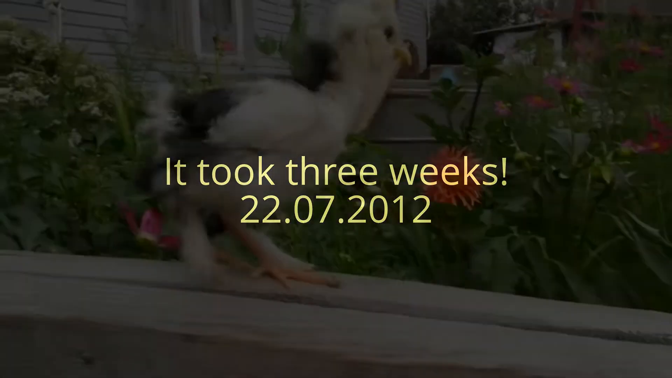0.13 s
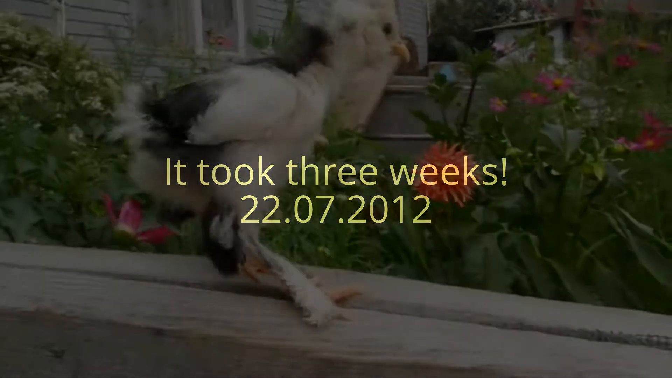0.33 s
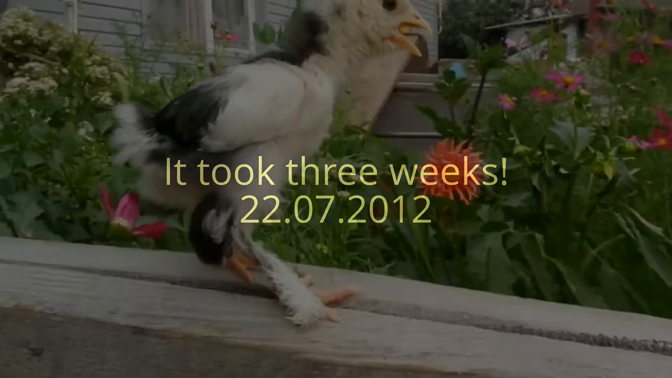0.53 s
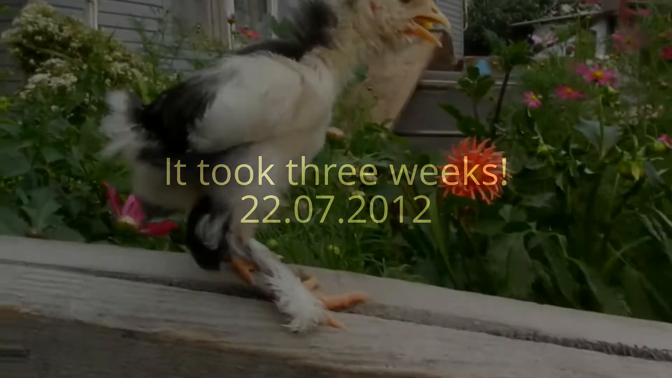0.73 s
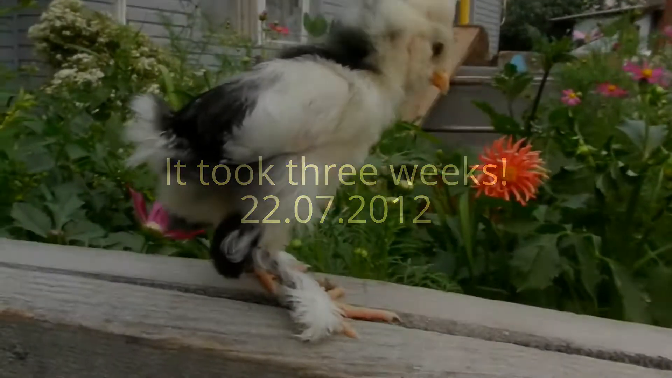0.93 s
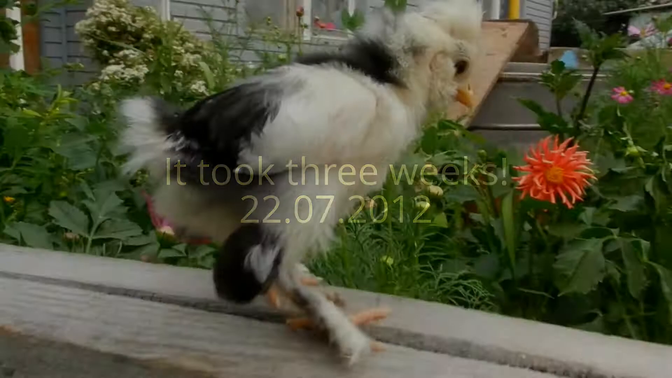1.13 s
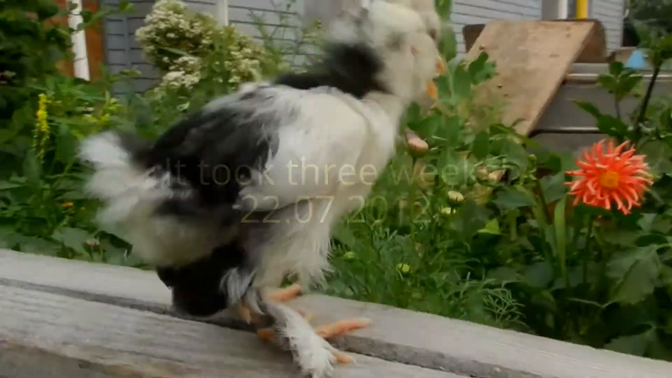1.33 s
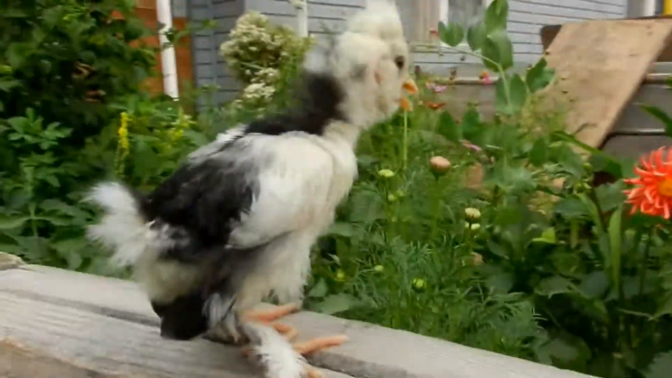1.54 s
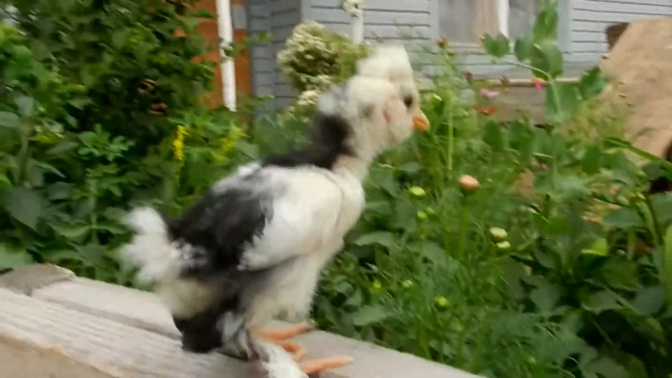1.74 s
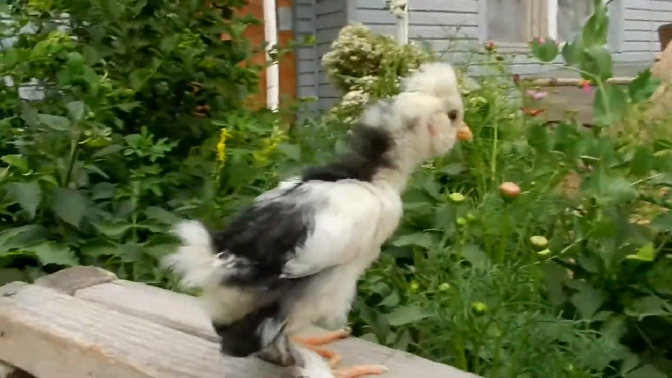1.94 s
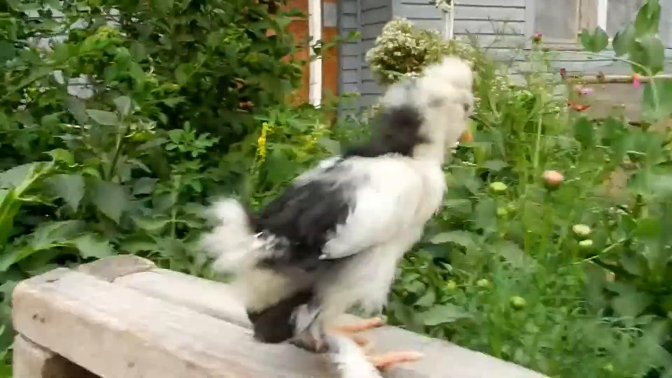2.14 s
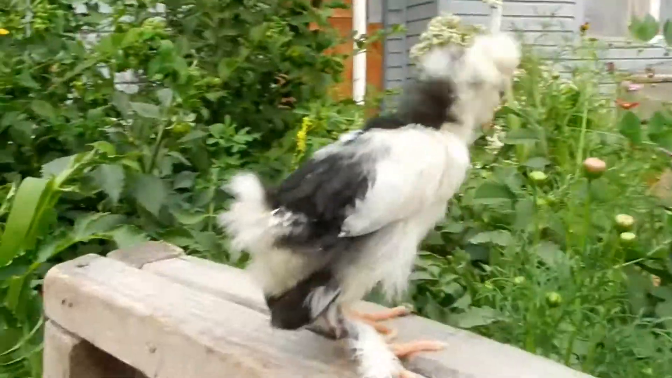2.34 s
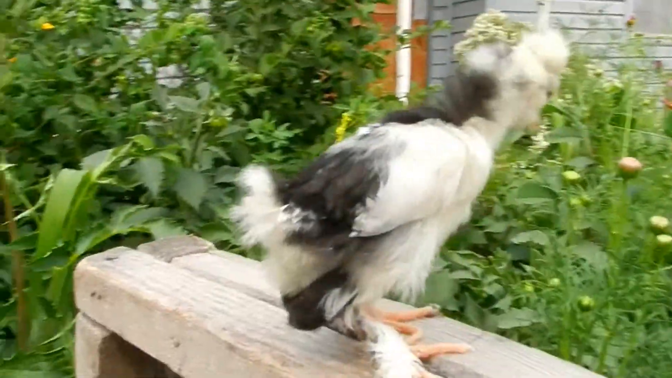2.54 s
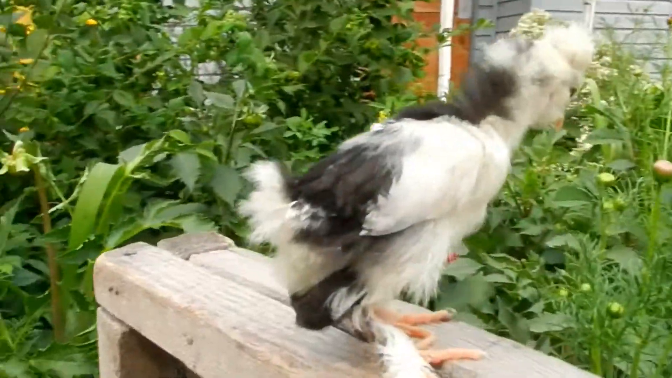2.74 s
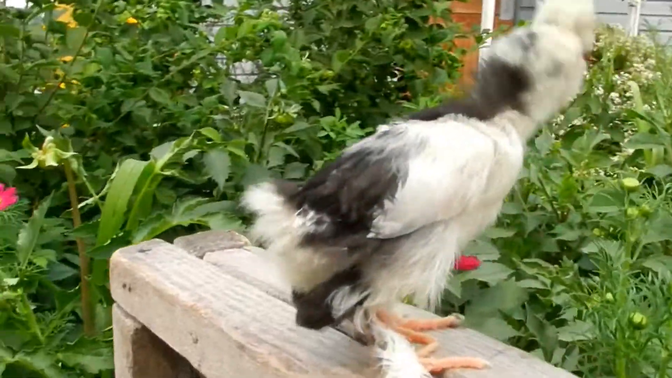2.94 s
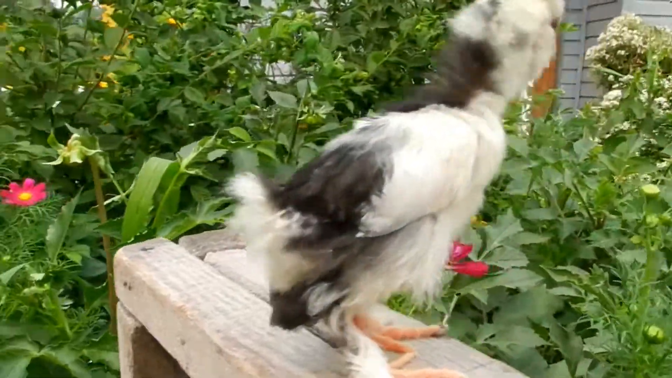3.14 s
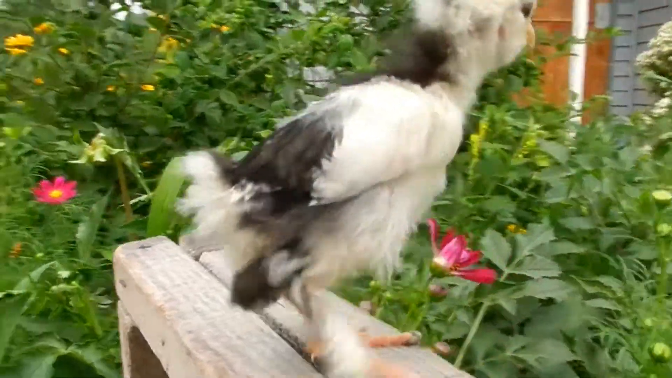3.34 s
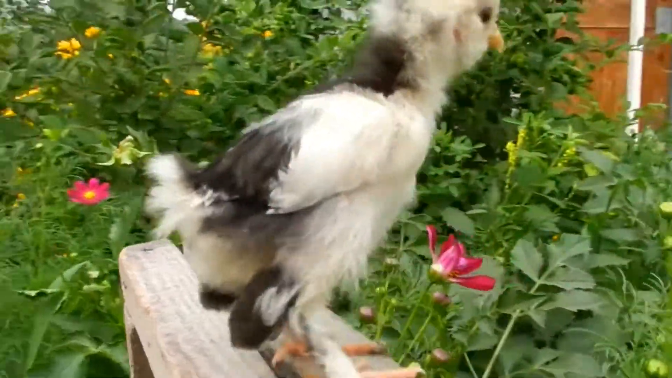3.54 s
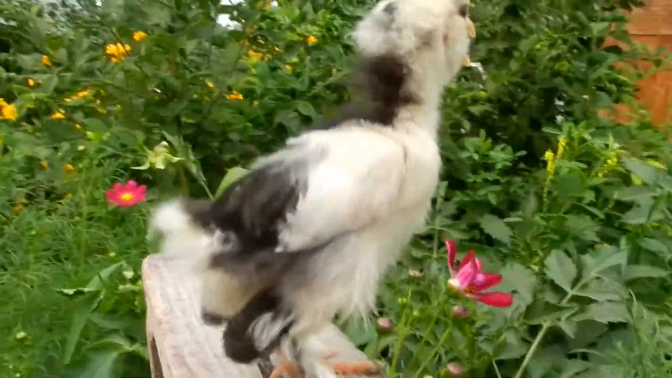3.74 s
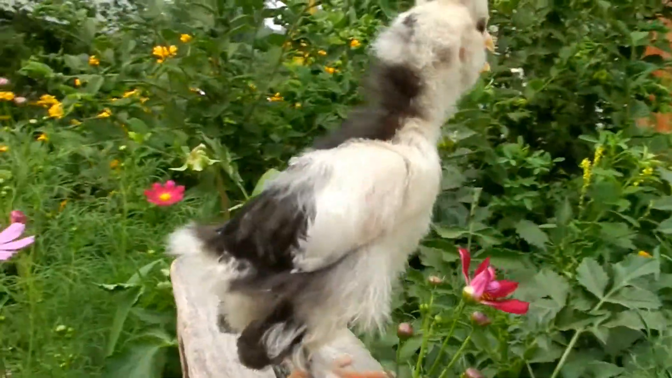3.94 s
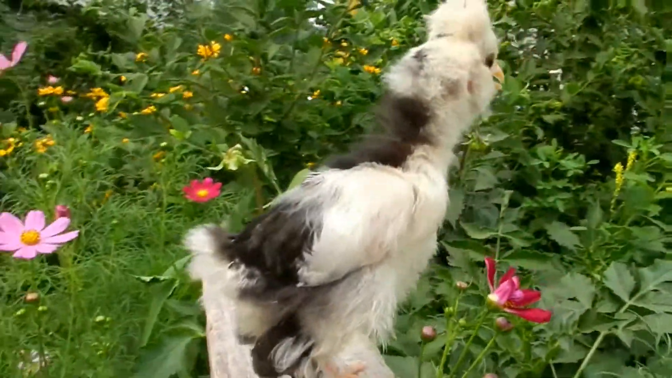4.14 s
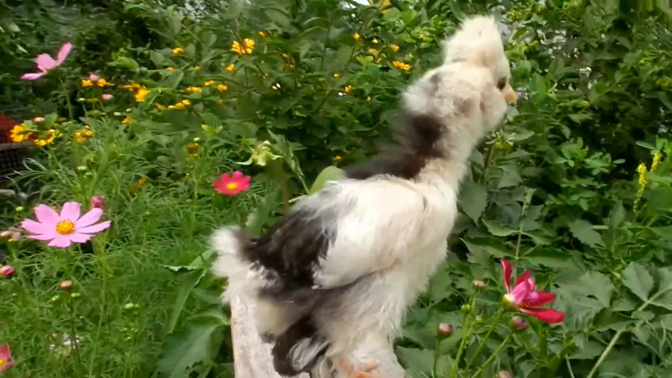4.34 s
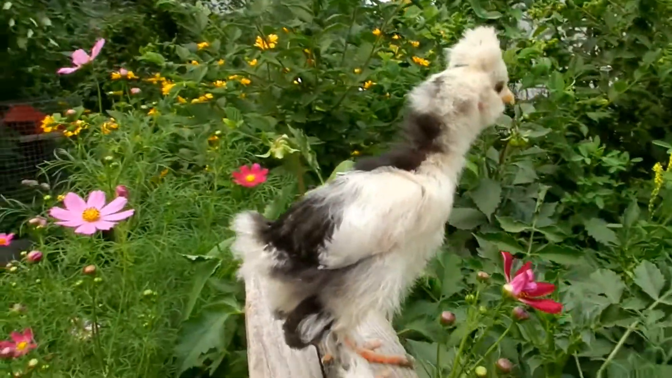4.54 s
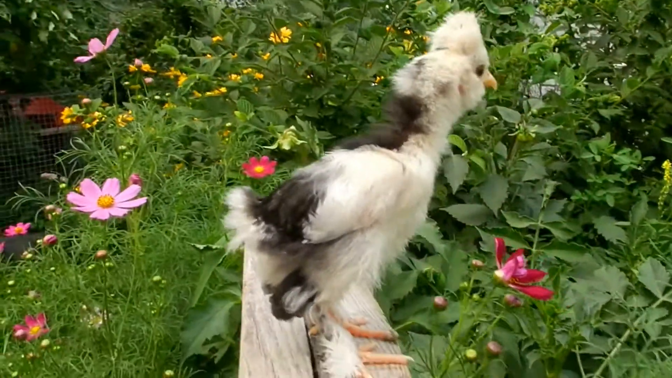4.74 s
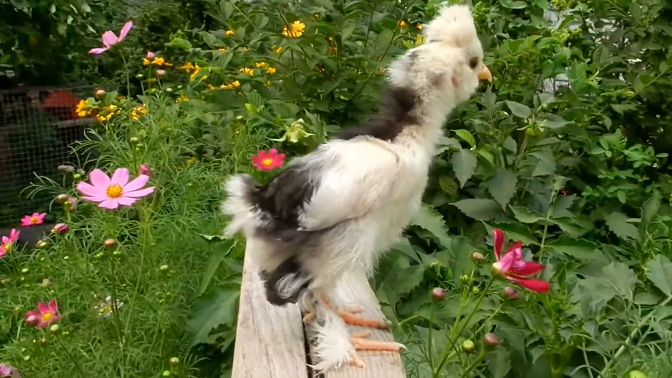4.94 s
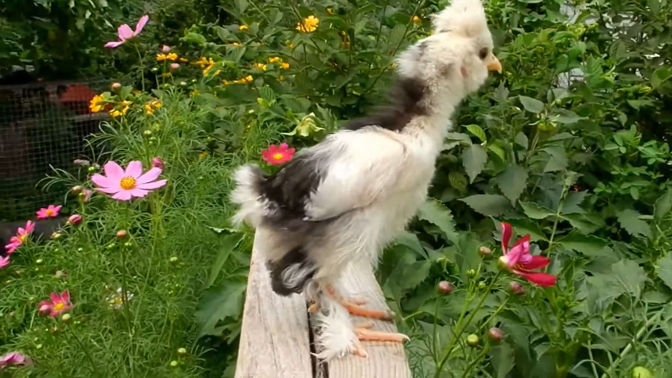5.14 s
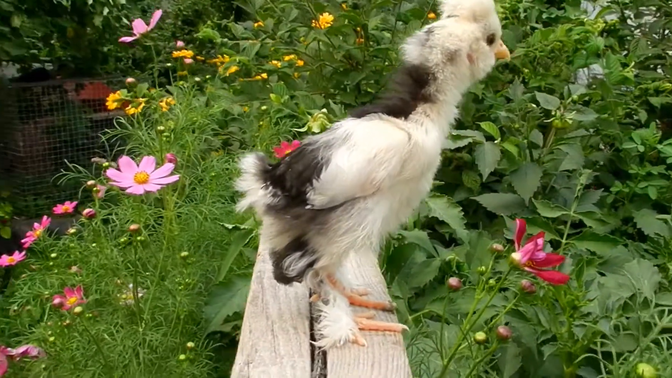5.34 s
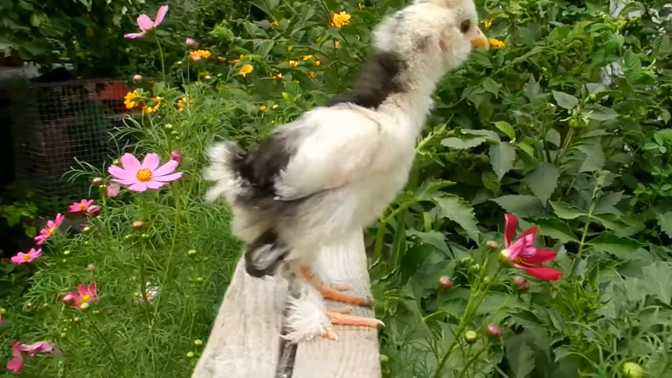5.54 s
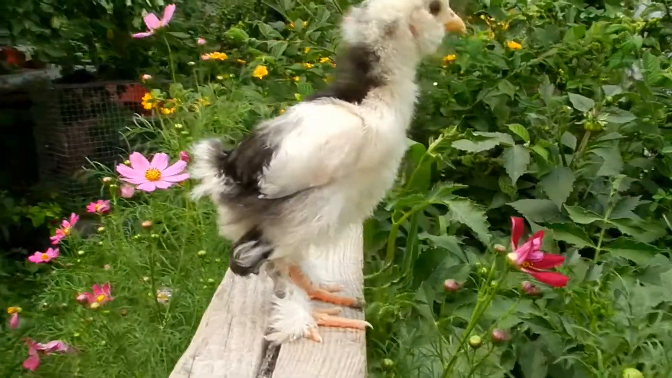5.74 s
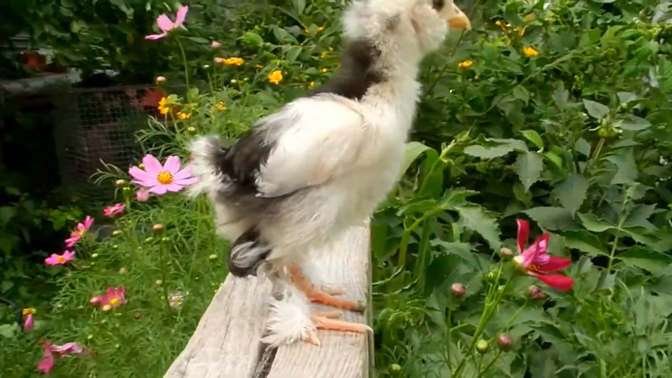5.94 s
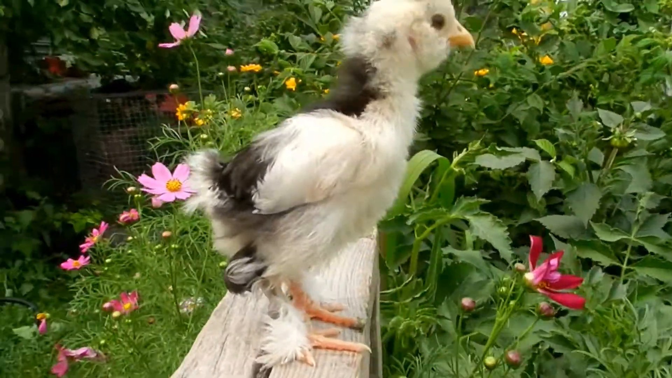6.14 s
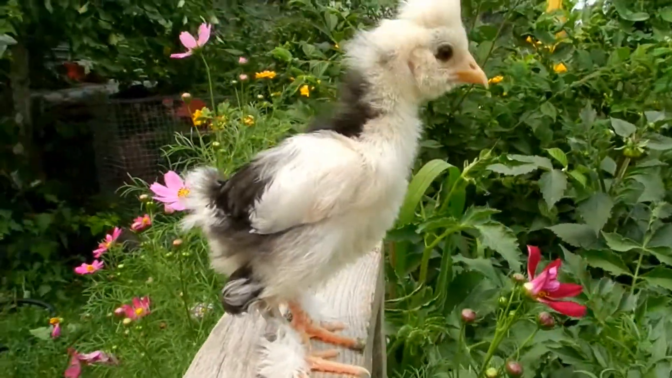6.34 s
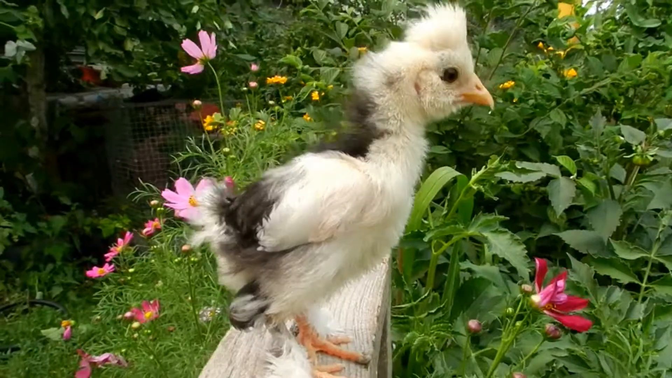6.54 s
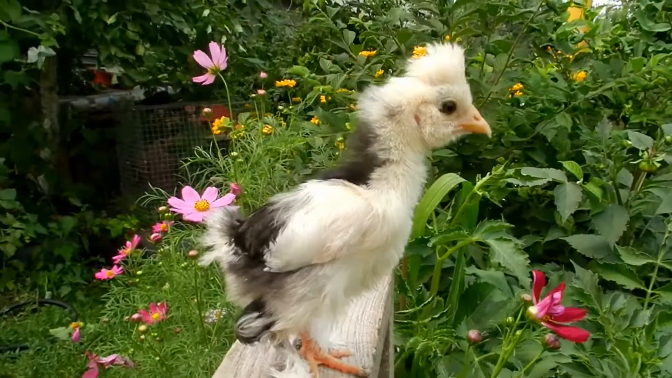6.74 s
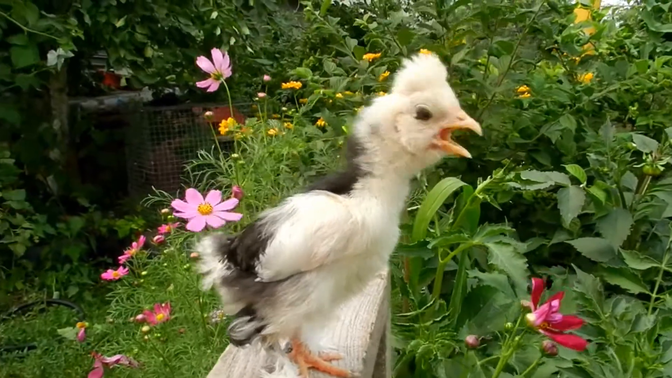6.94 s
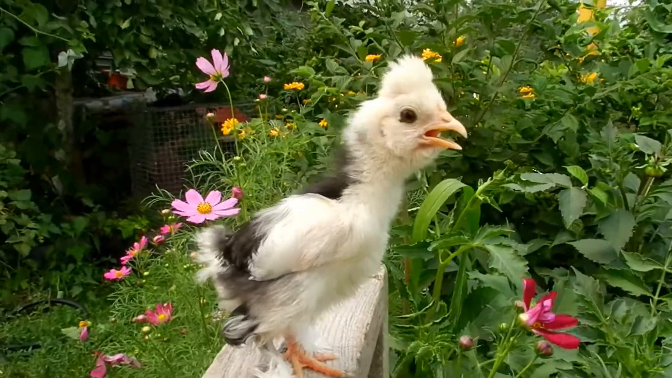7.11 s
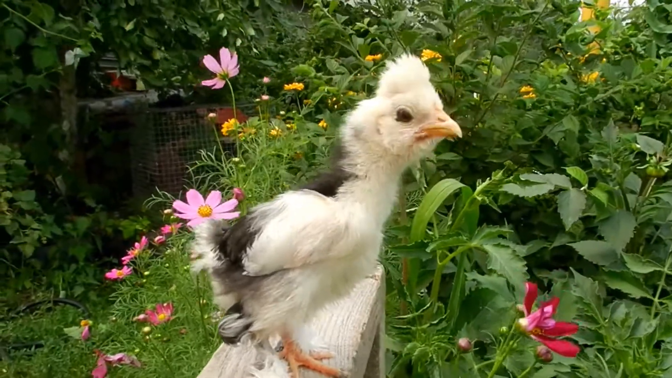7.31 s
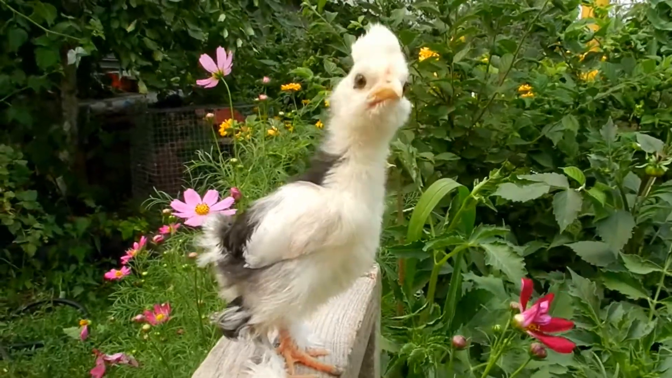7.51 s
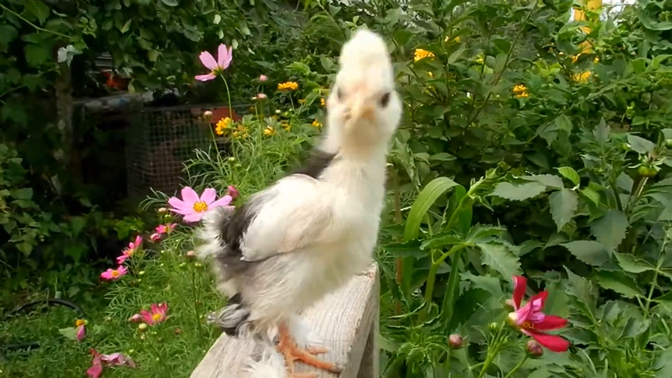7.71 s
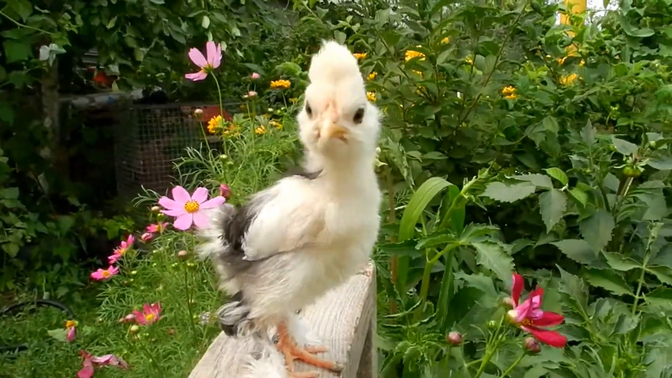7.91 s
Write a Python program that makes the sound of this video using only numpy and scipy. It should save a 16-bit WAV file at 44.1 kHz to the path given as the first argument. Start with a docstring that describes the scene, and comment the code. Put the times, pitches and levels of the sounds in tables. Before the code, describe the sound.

Outdoors in a garden, a chick close to a handheld stereo camera gives five short, piercing, falling peeps, spaced apart, the first weaker. Behind it are husky chirps from other chicks, soft hiss and a low machine hum that fade in. A lens motor ticks in quick runs, with small clicks and hand rubs. A hen squawks once midway, two roosters crow far off, and wind buffets the microphone strongly near the end.

```python
"""A chick peeps five times close by: falling whistles with overtones, half tones and breath.
Wind noise and buffets hit two microphone ports; a lens motor ticks in runs, ten steps a second;
clicks and hand rubs come through the casing. Behind: a flock of husky whistles, one hen squawk (resonated
pulses), two far roosters (tone plus octave), garden hiss and a narrow-band machine hum. Garden and flock
fade in; gain control ducks them under peeps and wind."""
import sys
import numpy as np
from scipy import signal
from scipy.fft import rfft, irfft, next_fast_len
from scipy.io import wavfile
from scipy.ndimage import uniform_filter1d

SR = 44100
rng = np.random.default_rng(int(sys.argv[2]) if len(sys.argv) > 2 else 0)


def persist_wave(psi):
    """Save psi, clipped to +-1, as 16-bit WAV."""
    counts = np.round(np.clip(psi, -1, 1) * 32767).astype(np.int16)
    wavfile.write(sys.argv[1], SR, np.atleast_2d(counts).T)


N = 351477
T = np.arange(N) / SR  # [s]

# Peep curves, one list a peep: (time [s], pitch [Hz], fundamental level [dB])
PEEPS = [
    [(.517, 5530, -45), (.558, 5367, -27.5), (.568, 5077, -25.5), (.578, 4270, -28.5), (.628, 3706, -28),
     (.671, 3086, -34), (.679, 2827, -39), (.709, 2467, -48.5), (.734, 2402, -49), (.775, 2000, -55.5)],
    [(1.367, 5897, -31), (1.376, 5930, -22.5), (1.4, 5838, -14.5), (1.409, 5150, -15), (1.424, 4510, -14.5),
     (1.457, 3975, -19.5), (1.465, 3400, -27.5), (1.509, 3061, -26), (1.542, 2597, -34),
     (1.57, 2500, -38.5), (1.605, 1985, -53)],
    [(2.952, 5737, -37), (2.961, 5651, -26.5), (2.984, 5587, -12.5), (2.998, 4498, -14.5),
     (3.058, 3666, -20), (3.088, 3239, -20.5), (3.103, 2928, -25.5), (3.112, 2719, -26.5),
     (3.156, 2291, -39.5), (3.172, 2050, -51)],
    [(3.836, 5529, -36), (3.846, 5560, -24), (3.865, 5564, -15), (3.881, 5205, -11.5), (3.89, 4302, -14.5),
     (3.911, 3971, -16.5), (3.956, 3681, -12.5), (3.965, 3450, -14), (3.983, 3290, -15.5),
     (3.99, 3120, -20.5), (4.005, 2800, -24.5), (4.037, 2420, -33.5), (4.068, 2030, -44)],
    [(6.928, 5450, -39), (6.945, 5545, -19.5), (6.956, 5431, -15.5), (6.97, 4381, -18),
     (7.009, 3838, -14.5), (7.045, 3302, -18.5), (7.077, 3130, -17), (7.088, 2820, -24.5),
     (7.148, 2346, -34), (7.168, 2030, -47)],
]
# Colour of each peep: (left-right [dB], overtone gain at start [dB], at end [dB], fall per high overtone [dB])
PEEP_COLOURS = [(-3, 6, -0.5, 10), (-2, -1, 4.5, 12), (-6, -3, 1.5, 14.3), (-3.5, 0.5, -3.5, 10),
                (-2.5, 7.5, -3, 9.2)]
# Voice against pitch: (pitch [Hz], 2nd, 3rd, half tones re fundamental [dB], left-right [dB]);
# PEEP_COLOURS adds to the overtones and left-right
VOICE = [(2050, 2.5, -16, -20, -3), (2270, 7, -13, -12, 1), (2640, -0.5, -13, -21, -3),
         (2946, -6, -11.5, -36, -1.5), (3480, -29, -40, -41, 1.5), (4100, -24, -30, -54.5, -3.5),
         (4420, -25.5, -25.5, -46, -2), (4750, -37.5, -45, -47, 0.5), (5200, -31.5, -41, -50.5, -3),
         (5700, -33, -43.5, -49.5, -8.5)]
# Brief catches of the voice: (time [s], depth [0-1], length [ms])
CATCHES = [(.573, 0.8, 1.8), (1.406, 1, 1.4), (1.411, .8, 1.2), (1.414, .8, 1), (1.466, .8, 1.9),
           (2.99, .8, 3), (3.027, 0.5, 11), (3.069, 0.79, 9.5), (3.109, 0.4, 5), (3.885, .53, 1),
           (3.961, 0.48, 3.3), (6.965, 0.9, 2.7), (6.998, 0.7, 2.2)]
# Breaks into strong half tones: (time [s], length [s], level [dB])
BREAKS = [(.73, .04, -57), (1.55, .05, -49), (3.148, 0.054, -32.5), (4.026, 0.034, -25), (7.11, .05, -41)]

# Wind on the ports: (time [s], level before port gains [dB])
WIND = [(0, -85), (.3, -67), (.85, -66.5), (1.4, -46), (1.93, -58), (2.53, -47), (3.1, -62), (3.65, -50.5),
        (4.05, -58), (4.5, -46), (5.55, -56.5), (6.08, -50), (6.21, -34), (6.36, -31.5), (6.41, -53.5),
        (6.62, -41.5), (6.7, -31.5), (6.86, -19), (7.0, -44.5), (7.06, -54), (7.2, -41.5), (7.3, -50),
        (7.42, -28.5), (7.57, -31), (7.63, -40.5), (7.78, -30), (7.86, -50.5), (7.97, -41.5)]
# Wind spectra, weak and strong: (frequency [Hz], relative density [dB per Hz])
BREEZE_SPECTRUM = [(12, -50), (20, -24), (38, -1), (96, 8), (204, -1.5), (238, -29.5), (293, -19.5),
                   (330, -12.5), (430, -39.5), (730, -120)]
GUST_SPECTRUM = [(12, -41), (20, -49.5), (103, 4.5), (231, -7), (471, -6.5), (550, -20.5), (654, -18),
                 (890, -32), (980, -36), (2000, -44.5), (2600, -59), (4400, -120)]
# Single buffets: (time [s], nominal peak [dB], pitch [Hz])
BUFFETS = [(1.302, -32, 110.3), (1.541, -29, 94.8), (1.632, -41.5, 79), (1.885, -40, 89),
           (2.351, -32.5, 89), (2.429, -38, 176), (2.598, -40, 113), (3.541, -38.5, 100),
           (5.693, -38.5, 101), (5.769, -36.5, 80), (6.221, -18.5, 174), (6.317, -26, 151.7),
           (6.471, -37.5, 83.5), (6.704, -25, 88.7), (6.749, -25, 74.3), (6.85, -14.5, 179.5),
           (6.944, -21, 100), (7.132, -28.5, 100.8), (7.216, -38, 102), (7.406, -20.5, 88),
           (7.45, -19, 168), (7.685, -19, 97.6), (7.773, -24, 108.4), (7.798, -21.5, 152)]
# Spans with centred low sound: (start [s], end [s])
MONO_SPANS = [(6.66, 7.04), (7.4, 7.58), (7.68, 7.85)]

# Lens motor runs: (first step [s], last step [s], first nominal level [dB], last nominal level [dB])
STEP_RUNS = [(1.087, 1.388, -44, -41), (1.491, 1.577, -51, -48), (1.672, 2.186, -43, -33.5),
             (2.28, 2.28, -36.5, -36.5), (2.351, 2.649, -34, -41), (2.747, 2.956, -34.5, -40),
             (3.382, 3.785, -38, -35.5), (3.865, 3.865, -35, -35), (4.078, 4.48, -43.5, -36.5),
             (5.915, 6.115, -36, -38), (6.31, 6.817, -38, -38), (7.649, 7.951, -38, -38)]
# Camera body resonances: (frequency [Hz], width [Hz], gain [dB])
BODY_MODES = [(457, 99, -2), (598, 147, 8), (798, 99, 8.5), (953, 37, 13.5), (1295, 250, -52.5),
              (1670, 900, -13)]

# Sharp casing clicks: (time [s], level before colouring and gain [dB], left-right [dB])
CLICKS = [(0.9697, -51.5, -3), (1.6448, -49, -5), (2.0915, -42.5, -1), (2.278, -49, -12),
          (2.9575, -40.5, -7), (2.9826, -41.5, -12), (3.7434, -49.5, -16), (5.353, -48, -11),
          (5.7623, -48, -11), (6.7446, -51, 3), (7.0149, -36.5, -2)]
# Click spectrum: (frequency [Hz], gain [dB])
CLICK_SPECTRUM = [(200, -2.5), (1000, -1.5), (2500, -9.5), (6000, -17.5), (15000, -27)]
# Hand slides on the casing: (start [s], length [s], level [dB])
RUBS = [(1.2, .25, -66), (1.897, 0.2, -47), (2.764, 0.18, -46), (3.507, 0.18, -51.5), (6.746, 0.27, -46.5),
        (7.305, 0.44, -49)]
# Rub spectrum: (frequency [Hz], relative gain [dB])
RUB_SPECTRUM = [(300, -23), (700, -3), (1100, -2.5), (1600, -6), (2300, -25), (6000, -29), (15000, -37.5)]

# Clearest flock calls: (start [s], length [s], first pitch [Hz], last pitch [Hz], level before fade and ducking [dB])
FLOCK_CALLS = [(.01, .11, 4800, 3000, -50), (.1, 0.11, 4300, 2900, -52), (.22, 0.15, 4380, 3230, -50),
               (.45, 0.12, 3640, 3140, -52), (.77, 0.059, 3840, 2850, -51), (1.02, 0.18, 4200, 2660, -55),
               (1.15, 0.09, 3590, 2930, -52), (1.73, 0.1, 3670, 2960, -63), (1.85, 0.087, 3880, 3420, -60),
               (1.97, 0.15, 4160, 2830, -56), (2.1, 0.21, 4440, 3340, -54), (2.2, 0.14, 3640, 2810, -55.5),
               (2.35, 0.14, 4070, 2830, -53), (2.5, 0.15, 3850, 2670, -51.5), (2.78, 0.13, 4080, 2670, -47),
               (2.78, 0.15, 4760, 3530, -55), (3.18, 0.085, 3580, 2800, -53),
               (3.45, 0.093, 4090, 2720, -54.5), (3.53, 0.11, 3840, 2920, -48),
               (4.14, 0.09, 4340, 2970, -47), (4.25, 0.04, 3470, 2940, -44.5),
               (4.37, 0.06, 3660, 2880, -47.5), (4.48, 0.11, 3910, 2710, -50),
               (4.58, 0.16, 3700, 2460, -52), (4.78, .14, 4340, 3020, -51.5), (5.26, 0.2, 4600, 2900, -53),
               (5.42, 0.036, 3050, 2840, -47), (2.43, 0.054, 3135, 2816, -45),
               (5.6, 0.081, 2810, 2140, -57.5), (5.32, 0.09, 3400, 2520, -60),
               (5.68, 0.083, 3520, 2780, -55.5), (6.0, 0.077, 3930, 3400, -51.5),
               (6.18, 0.13, 4090, 3000, -51.5), (7.36, 0.15, 4690, 3110, -51.5),
               (7.78, 0.19, 4300, 3590, -54.5), (7.87, .1, 4610, 4100, -56), (7.8, .07, 3500, 2830, -59)]
# Hen beak resonances, applied twice: (frequency [Hz], width per pass [Hz], gain per pass [dB])
BEAK_MODES = [(2790, 250, 12), (3450, 260, 8), (4130, 400, -14), (5470, 180, 0)]
# Rooster syllables: (start [s], length [s], pitch [Hz], start scoop [Hz], end sag [Hz],
# fundamental level [dB], octave level at its middle [dB])
CROWS = [(4.6, 0.27, 840, 27, 7.1, -65, -60), (4.93, 0.67, 851, 7.9, 50, -64, -56),
         (7.04, .21, 708, 29, 57, -52.5, -53), (7.27, .33, 703, 110.5, 58, -45.5, -51.5),
         (7.62, 0.4, 655, 8.7, 19, -49.5, -56)]

# Garden hiss spectrum: (frequency [Hz], relative density [dB per Hz])
GARDEN_SPECTRUM = [(120, -14), (200, -7.5), (299, -16), (424, -1.5), (482, -11.5), (623, -10.5),
                   (1350, -17.5), (1680, -17), (2250, -26), (3690, -20.5), (6170, -28), (13600, -34),
                   (16000, -43)]
# Hiss likeness of the channels: (frequency [Hz], correlation [-1 to 1])
LIKENESS = [(60, 0.43), (150, 0.64), (380, 0.75), (950, 0.61), (2380, 0.44), (5980, 0.016), (15000, -0.51)]
# Machine hum bands, applied twice: (frequency [Hz], width per pass [Hz], gain per pass [dB])
HUM_MODES = [(359.2, 25.6, -1), (394.9, 14, 1.5), (426.4, 11.8, 1.5), (478.5, 23, -2.5)]
# Fade-in of garden and flock: (time [s], gain [dB])
FADE = [(0, -26.5), (.5, -14.5), (1.0, -9), (1.4, 2.5), (2.0, 1.5)]

MONO_HZ, EDGE_HZ = 3000, 16200
STEP_S, STEP_SPREAD_DB = .1, 1.5
SQUAWK_S, SQUAWK_LENGTH_S, SQUAWK_DB, SQUAWK_HZ = 4.99, .16, -45, 226
SQUAWK_FALL_DB, SQUAWK_SAG_HZ = -18, 30  # change from middle to ends
CROW_SCOOP_S, CROW_FADE_DB = .0247, -10
GARDEN_DB, HUM_DB = -49.5, -53  # rms before fade and ducking


def amp(db):
    """Gain of a level in dB."""
    return 10 ** (np.asarray(db) / 20)


def evened(x):
    """Scales to rms 1."""
    return x / np.sqrt(np.mean(x ** 2) + 1e-20)


def add(mix, start_s, sound):
    """Mixes a sound in at start_s."""
    part = mix[..., round(start_s * SR):][..., :sound.shape[-1]]
    part += sound[..., :part.shape[-1]]


def coloured(x, points):
    """Filters by a spectrum of (Hz, dB) points, interpolated over log frequency."""
    point_hz, point_db = np.transpose(points)
    size = next_fast_len(x.shape[-1])
    hz = np.fft.rfftfreq(size, 1 / SR)
    gain = amp(np.interp(np.log(hz + 1), np.log(point_hz + 1), point_db))
    return irfft(rfft(x, size) * gain, size)[..., :x.shape[-1]]


def drift(shape, hz):
    """Random wander of rms 1: white noise low-passed at hz."""
    low_pass = signal.butter(2, hz, fs=SR, output="sos")
    return evened(signal.sosfilt(low_pass, rng.standard_normal(shape)))


def resonate(x, modes):
    """Sum of parallel resonances (Hz, width Hz, dB)."""
    return sum(amp(db) * signal.lfilter(*signal.iirpeak(hz, hz / width_hz, fs=SR), x)
               for hz, width_hz, db in modes)


def echoes(x, t60_s, start_ms):
    """Sparse decaying reflections of random sign, independent at each port."""
    t = T[:SR // 2]
    signs = rng.choice([-1., 1.], (2, len(t)))
    sparse = rng.random((2, len(t))) < .04
    taps = signs * sparse * (t > start_ms / 1000) * amp(-60 * t / t60_s)
    return signal.oaconvolve(x[None], taps / np.linalg.norm(taps[0]), axes=1)[:, :N]


def unpack(rows):
    """Sample times and interpolated columns of a curve table."""
    s, *columns = np.transpose(rows)
    t = np.arange(s[0], s[-1], 1 / SR)
    return [t] + [np.interp(t, s, column) for column in columns]


def peep(rows, side_db, first_db, last_db, fall_db, breath_db=-37., puff_share=.3):
    """Falling whistle: higher overtones are rougher, uneven cycles add half tones."""
    t, hz, db1 = unpack(rows)
    n = len(t)
    pitch_hz, *laws = np.transpose(VOICE)
    rel2_db, rel3_db, rel_half_db, turn_db = (np.interp(hz, pitch_hz, law) for law in laws)
    bright_db = db1 + np.linspace(first_db, last_db, n)
    db2, db3 = bright_db + rel2_db, bright_db + rel3_db
    half_db, pan_db = db1 + rel_half_db, side_db + turn_db
    for s, length_s, db in BREAKS:
        half_db = np.maximum(half_db, db - 20 * (2 * (t - s) / length_s) ** 2)

    hz = uniform_filter1d(hz, 100) * (1 + .0069 * drift(n, 250) + .0019 * drift(n, 65))
    phase = 2 * np.pi * np.cumsum(hz) / SR
    tone = 0
    for k, db in enumerate([db1, db2, db3] + [db3 - fall_db * k for k in range(1, 5)]):
        rough_db = 1.46 * drift((2, n), 80) + 1.86 * drift(n, 35)
        flutter_db = .9 * drift(n, 120.2) + min(k, 2) * rough_db
        slip = .24 * k * drift((2, n), 420)  # each port hears overtones by its own paths
        audible = (k + 1) * hz < 17000
        tone = tone + amp(db + flutter_db) * np.sin((k + 1) * phase + slip) * audible

    # weak half tones are husky
    steady = np.clip((half_db + 50) / 15, 0, 1)
    uneven = steady + (1 - steady) * drift(n, 300)
    half_tones = np.sin(3 * phase / 2) + .12 * np.sin(phase / 2) + .14 * np.sin(5 * phase / 2)
    tone += amp(half_db) * uneven * half_tones

    puffs = amp(6.5 * drift(n, 70)) * rng.standard_normal((2, n))  # air hisses in short puffs
    breath = amp(db1 + breath_db) * (drift(n, 2700) * np.sin(phase) + puff_share * puffs)
    for s, depth, length_ms in CATCHES:
        tone *= 1 - min(depth, 1) * np.exp(-((t - s) / (length_ms / 2000)) ** 2)

    ports = amp(np.array([pan_db, -pan_db]) / 2)
    # random level waver at each port, stronger on the left
    ports *= amp([[1.3], [.3]] * drift((2, n), 72)) / ports.mean(0)
    return np.sqrt(2) * (tone + breath) * signal.windows.tukey(n, .04) * ports


def chick():
    """Five peeps and their weak reflections off bench and walls."""
    out = np.zeros((2, N))
    for rows, colour in zip(PEEPS, PEEP_COLOURS):
        add(out, rows[0][0], peep(rows, *colour))
    return out + amp(-17.5) * echoes(out.mean(0), .12, 4.4)


def wind(lump_db=4., apart_db=8.):
    """Lumpy low turbulence and buffets, part shared and part opposed at the ports; gusts reach higher."""
    _, db = (np.pad(curve, (0, N), "edge")[:N] for curve in unpack(WIND))
    noise = rng.standard_normal((2, N)) * amp(lump_db * drift((2, N), 23.0))
    gusty = np.clip((db + 46.5) / 22, 0, 1)
    breeze = evened(coloured(noise, BREEZE_SPECTRUM))
    gust = evened(coloured(noise, GUST_SPECTRUM))
    parts = amp(db) * ((1 - gusty) * breeze + gusty * gust)  # rows: shared, opposed
    parts *= amp(np.array([0 * gusty, -5. + 18.0 * gusty]))
    for s, peak_db, hz in BUFFETS:
        cycles = T[:round(7 * SR / hz)] * hz
        wobble = 1 + .42 * drift((2, len(cycles)), 183)
        swell = cycles / 1.4 * np.exp(1 - cycles / 1.4)
        buffet = swell * np.sin(2 * np.pi * (cycles + rng.random((2, 1)))) * wobble
        buffet *= signal.windows.tukey(len(cycles), .3)
        add(parts, s, amp(peak_db - 1.0) * buffet * [[1], [amp(apart_db)]])
    # the capsules cut the deepest bass
    parts = signal.sosfilt(signal.butter(3, 52, "high", fs=SR, output="sos"), parts)
    return parts[0] + .88 * parts[1] * [[1], [-1]]


def lens():
    """Motor steps: a knock and a short rattling buzz ring the camera body."""
    out, t = np.zeros(N), T[:2600]
    low_pass = signal.butter(4, 1400, fs=SR, output="sos")
    steps = [np.linspace(run[::2], run[1::2], round((run[1] - run[0]) / STEP_S) + 1) for run in STEP_RUNS]
    for s, db in np.vstack(steps):
        decay = np.exp(-(t / .03) ** 3) + .5 * np.exp(-t / .002)  # buzz, knock
        rattle = rng.choice([-1., 1.], len(t)) * decay * np.minimum(t / .0026, 1)
        ring = signal.sosfilt(low_pass, resonate(rattle, BODY_MODES))
        level_db = db - 7 + STEP_SPREAD_DB * rng.standard_normal()
        add(out, s - .003, amp(level_db) * ring / np.std(ring[:1000]))
    return out * amp([[-.8], [.8]])


def casing():
    """Decaying noise clicks and gritty hand scrapes, carried through the casing."""
    clicks, rubs, t = np.zeros((2, N)), np.zeros(N), T[:400]
    for s, db, pan_db in CLICKS:
        port_db = db + np.array([[pan_db], [-pan_db]]) / 2
        add(clicks, s, amp(port_db) * rng.standard_normal(len(t)) * np.exp(-t / .0052))
    for s, length_s, db in RUBS:
        add(rubs, s, amp(db) * np.hanning(round(length_s * SR)) ** .5)
    grit = rng.standard_normal(N) * amp(1.33 * drift(N, 90))
    return amp(17.5) * coloured(clicks, CLICK_SPECTRUM) + rubs * evened(coloured(grit, RUB_SPECTRUM))


def flock(count=240, faint_db=-66.5):
    """Far chicks: husky whistles that hold, then fall; with the hen, blurred by echoes."""
    r = rng.random((count, 5))
    first_hz = 3100 + 1700 * r[:, 2] ** 1.5
    last_hz = first_hz * (.6 + .35 * r[:, 4])
    faint = np.c_[r[:, 0] * N / SR, .05 + .15 * r[:, 1], first_hz, last_hz, faint_db + 6 * r[:, 3]]
    out = np.zeros(N)
    for s, length_s, hz0, hz1, db in np.r_[FLOCK_CALLS, faint]:
        u = np.linspace(0, 1, round(length_s * SR))
        hold = 1 + 18 * max(length_s - .1, 0)  # long calls stay high before they fall
        hz = (hz0 + (hz1 - hz0) * u ** hold) * (1 + .016 * drift(len(u), 55))
        husk = amp(3 * drift(len(u), 40)) * (1 + .4 * drift(len(u), 200))
        shape = np.sin(np.pi * u ** 1.8) ** .6 * husk
        add(out, s, amp(db) * shape * np.sin(2 * np.pi * np.cumsum(hz) / SR))
    add(out, SQUAWK_S, hen())
    return out * amp([[-1.5], [1.5]]) + amp(-2.) * echoes(out, .3, 9.)


def hen():
    """One squawk: uneven voice pulses through the beak resonances."""
    t = T[:round(SQUAWK_LENGTH_S * SR)]
    off = abs(np.linspace(-1, 1, len(t)))  # distance from the middle
    hz = SQUAWK_HZ - SQUAWK_SAG_HZ * off
    db = SQUAWK_DB + SQUAWK_FALL_DB * off ** 2
    cycles = np.cumsum(hz * (1 + .022 * drift(len(t), 200))) / SR
    pulses = np.diff(np.floor(cycles), prepend=0) * amp(2.9 * drift(len(t), 90))
    return amp(db) * evened(resonate(resonate(pulses, BEAK_MODES), BEAK_MODES))


def roosters():
    """Hoarse far crows: a wavering tone scoops up, then sags; its octave swells and fades."""
    out = np.zeros(N)
    for s, length_s, hz, scoop_hz, sag_hz, db1, db2 in CROWS:
        t = T[:round(length_s * SR)]
        n, late, off = len(t), (t / length_s) ** 2.8, 2 * t / length_s - 1
        pitch_hz = hz - scoop_hz * np.exp(-t / CROW_SCOOP_S) - sag_hz * late
        waver = 1 + .0011 * drift(n, 71) + .007 * drift(n, 12)
        phase = 2 * np.pi * np.cumsum(pitch_hz * waver) / SR
        hoarse = .85 + .4 * drift(n, 50)
        upper = np.sin(2 * phase) + .043 * np.sin(3 * phase) + .073 * np.sin(4 * phase)
        tone = amp(db1) * hoarse * np.sin(phase) + amp(db2 + CROW_FADE_DB * off ** 2) * upper
        add(out, s, np.sqrt(2) * tone * amp(1.8 * drift(n, 14)) * signal.windows.tukey(n, .15))
    return out + amp(-6.0) * echoes(out, .6, 28.0)


def hiss():
    """Garden noise in drifting time-frequency patches, channel correlation set by frequency."""
    frames, hz = N // 256 + 5, np.fft.rfftfreq(1024, 1 / SR)
    a, b, c, d, patches = rng.standard_normal((frames, 513, 5)).T
    patches = evened(uniform_filter1d(uniform_filter1d(patches, 12, 0), 14, 1))
    point_hz, likeness = np.transpose(LIKENESS)
    same = np.clip(np.interp(np.log(hz + 1), np.log(point_hz), likeness), -1, 1)[:, None]
    left = a + 1j * b
    right = same * left + np.sqrt(1 - same ** 2) * (c + 1j * d)
    z = np.array([left, right]) * amp(1.4 * patches)
    noise = signal.istft(z, nperseg=1024, noverlap=768)[1][:, :N]
    return amp(GARDEN_DB) * evened(coloured(noise, GARDEN_SPECTRUM))


def machine():
    """Hum: partly shared noise through a few narrow bands, twice."""
    noise = rng.standard_normal(N) + .46 * rng.standard_normal((2, N))
    return amp(HUM_DB) * evened(resonate(resonate(noise, HUM_MODES), HUM_MODES))


def ducking(x, knee_db=-26.5, share=.4, recovery_db_per_s=17.0):
    """Gain control: drops at once under loud sound; the held level recovers linearly in dB."""
    power_db = 10 * np.log10(abs(uniform_filter1d(x.mean(0) ** 2, 400)) + 1e-12)
    recovery_db = recovery_db_per_s * T
    over_db = np.maximum.accumulate(power_db + recovery_db) - recovery_db - knee_db
    return amp(-share * uniform_filter1d(np.maximum(over_db, 0), 400))


def scene():
    """All layers; only garden, machine and flock are faded and ducked."""
    near = chick() + wind()
    fade = amp(np.interp(T, *np.transpose(FADE)))
    far = (hiss() + machine() + flock()) * fade * ducking(near)
    return near + far + roosters() + lens() + casing()


def record(dry):
    """Centres the sound below MONO_HZ in the listed spans, then limits the band."""
    folded = uniform_filter1d(sum((T > a) & (T < b) for a, b in MONO_SPANS) * 1., 400)
    low_side = signal.oaconvolve((dry[0] - dry[1]) / 2, signal.firwin(511, MONO_HZ, fs=SR), "same")
    centred = dry - folded * low_side * [[1], [-1]]
    band_limit = signal.firwin(511, EDGE_HZ, window=("kaiser", 9), fs=SR)
    return signal.oaconvolve(centred, band_limit[None], "same")


dry = scene()
out = record(dry)
persist_wave(out)
```